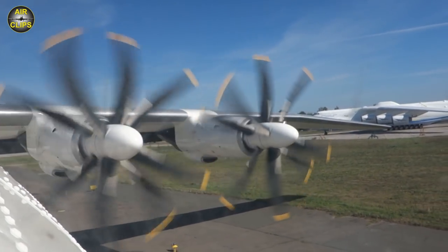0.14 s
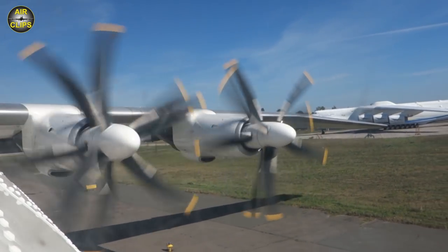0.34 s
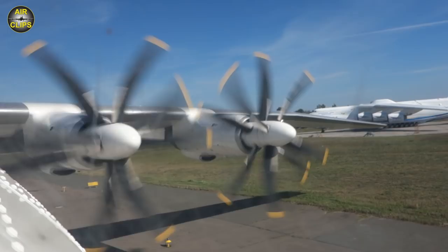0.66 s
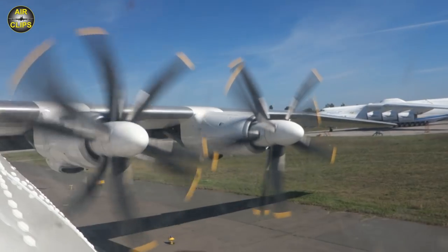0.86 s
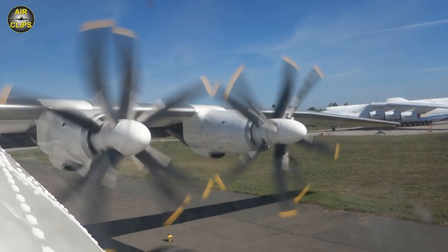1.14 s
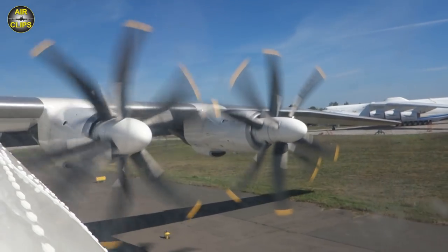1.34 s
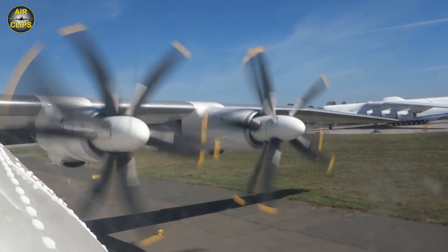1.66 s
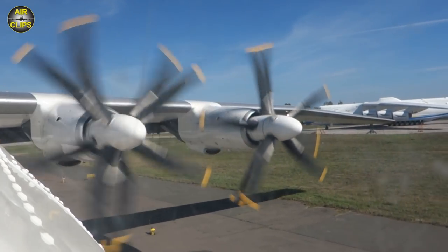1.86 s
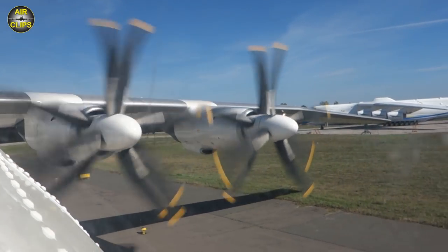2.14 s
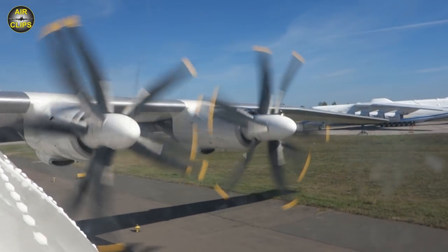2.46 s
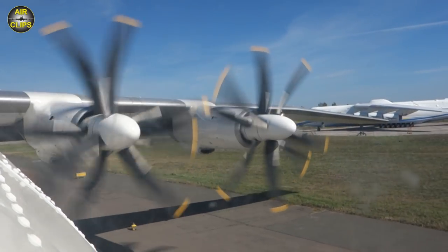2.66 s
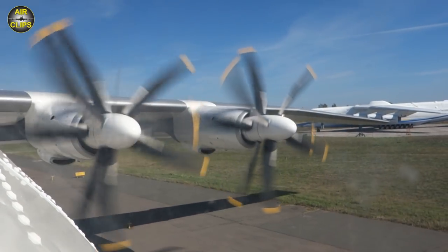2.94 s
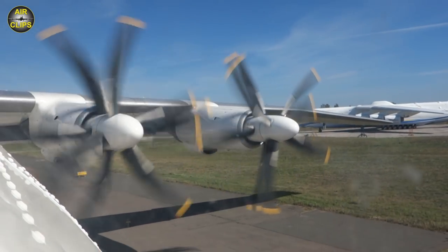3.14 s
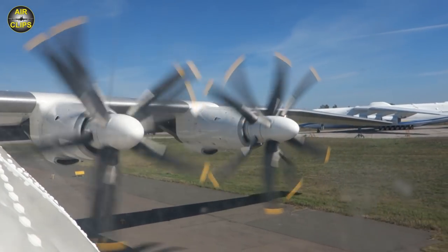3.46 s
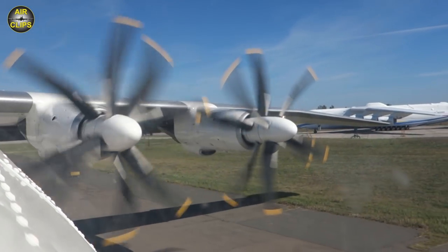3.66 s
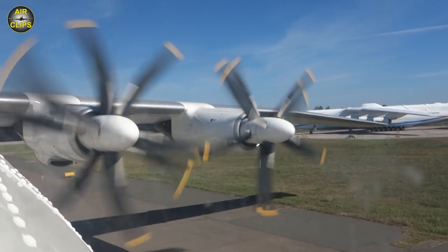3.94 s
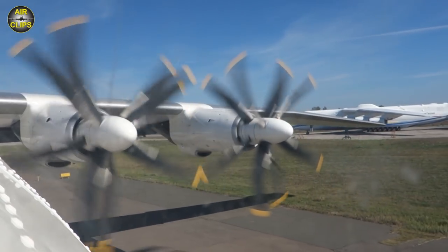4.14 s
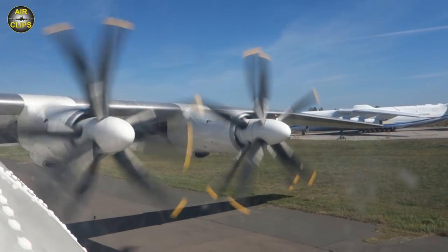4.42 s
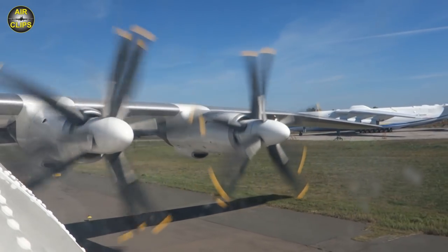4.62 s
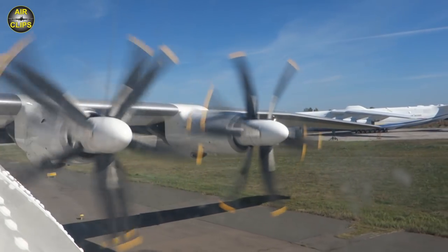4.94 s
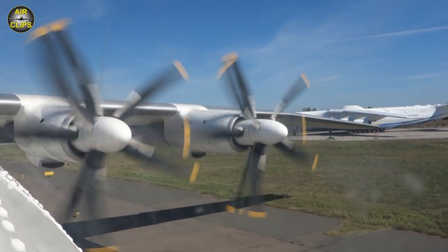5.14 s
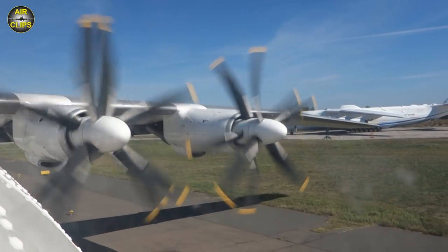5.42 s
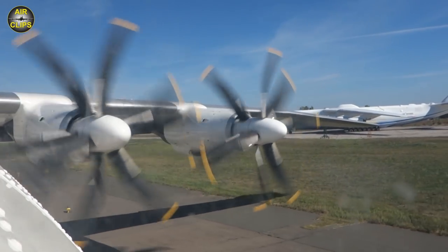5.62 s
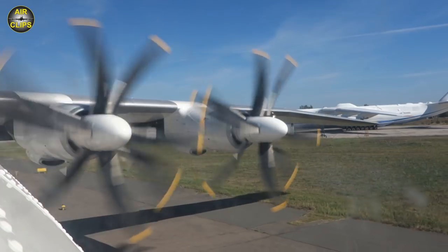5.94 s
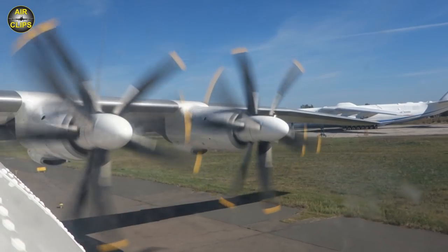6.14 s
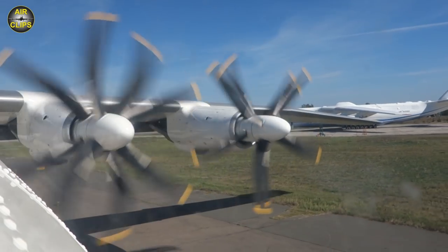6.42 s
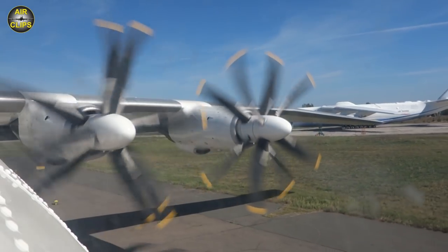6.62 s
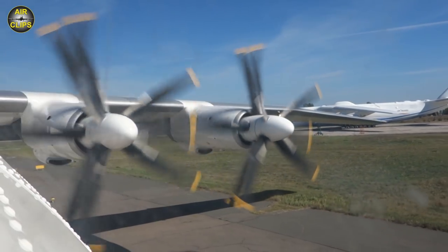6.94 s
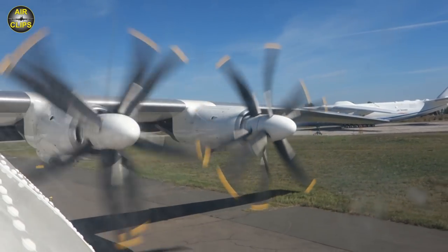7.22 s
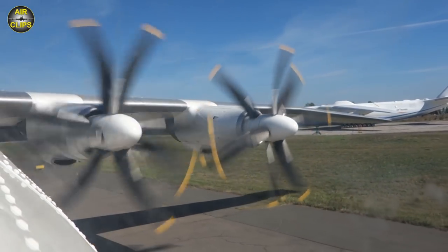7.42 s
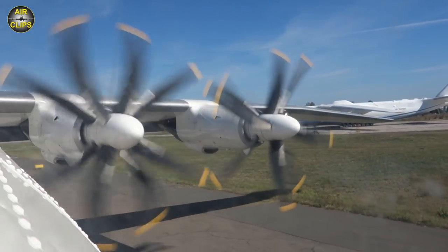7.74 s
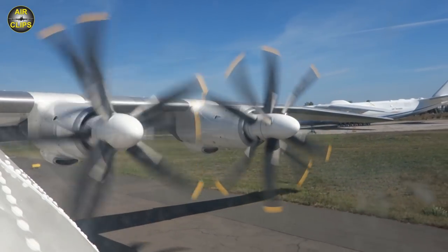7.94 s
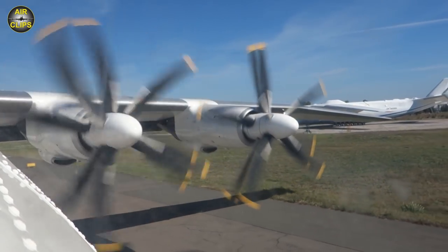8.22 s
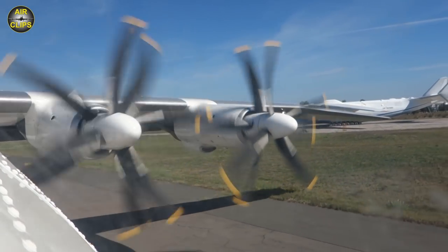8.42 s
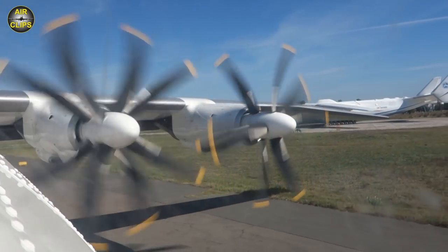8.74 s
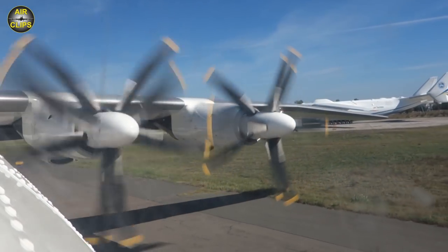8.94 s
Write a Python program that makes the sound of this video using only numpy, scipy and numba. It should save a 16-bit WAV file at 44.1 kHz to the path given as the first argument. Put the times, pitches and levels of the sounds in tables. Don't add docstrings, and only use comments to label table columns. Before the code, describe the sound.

Heard in the cabin beside the wing, large turboprop engines roar loudly and without pause. Two propellers, tuned almost alike, drone and beat together in a low buzzing throb. Muffled rushing air and softer hiss ride above. A thin turbine whine flutters in and out, rises slightly, then after seven seconds slides down; at the very end the hiss brightens.

```python
import sys
import numpy as np
from scipy import signal
from scipy.fft import rfft, irfft
from scipy.io import wavfile
from scipy.ndimage import uniform_filter1d
from numba import njit

SR = 44100
rng = np.random.default_rng(int(sys.argv[2]) if len(sys.argv) > 2 else 0)


def makeup_ratio(level_db):
    decades = np.asarray(level_db, float) / 20
    return 10 ** decades


def unload_audio(sound):
    columns = np.transpose(np.atleast_2d(sound))
    steps = np.round(np.clip(columns, -1, 1) * 32767)
    wavfile.write(sys.argv[1], SR, steps.astype(np.int16))


N = 399987

# frequency in Hz, level in dB per Hz.
ROAR_SPECTRUM = [(12, -38.5), (20, -34.5), (42, -31), (62, -32.5), (80, -15.5), (105, -6), (125, -6.5),
                 (160, -2.5), (215, -2.5), (270, -2.5), (340, -2), (405, -0.5), (435, 0.5), (515, -1.5),
                 (535, -17.5), (600, -19), (780, -27.5), (1320, -120)]
WALL_SPECTRUM = [(330, -39), (560, -1), (750, -4), (822, -1), (884, -3.5), (934, -1), (987, 4),
                 (1040, -1.5), (1140, -15), (1270, -5), (1410, -8), (1610, -2), (1740, -9.5), (2070, -10.5),
                 (2400, -29.5), (3120, -56.5), (5280, -120)]
HISS_SPECTRUM = [(1410, -31.5), (2400, -11), (2620, 0.5), (2940, -9.5), (3100, -6.5), (3310, -9.5),
                 (3640, -2.5), (3880, -6), (4200, -14.5), (4350, -9.5), (4650, -15), (5500, -38)]
TOP_SPECTRUM = [(4200, -26), (4800, -1), (6000, 0), (6900, -2), (7650, -4), (9000, -3.5), (10900, -6),
                (14100, -39)]
DUCT_SPECTRUM = [(6500, -29), (6950, -8.5), (7100, 0.5), (7300, 0.5), (7550, -5), (8000, -31)]
# time in seconds, level in dB about the mean.
AIRFLOW = [(0, 0), (.3, 1), (.8, -1.1), (1.3, -0.7), (2.2, -0.9), (2.9, -0.1), (3.5, -0.5), (4.5, -1.9),
           (5.8, -0.5), (6.4, -0.5), (7.2, 0.5), (7.8, -1.1), (9.07, 0.2)]
# centre in seconds, length in seconds, rise in dB.
WASH_GUSTS = [(0.196, 0.072, 2.5), (1.002, 0.3, 0), (1.949, .1, 1.5), (2.586, 0.6, 2), (2.983, 0.14, 1),
              (4.078, .08, 1.5), (5.203, 0.066, -0.5), (5.358, 0.089, -2), (6.215, 0.13, 0.5),
              (6.55, .15, 2), (7.206, .1, 1), (7.472, .08, 1), (7.749, 0.066, 1.5), (8.67, 0.11, 1)]
# wall, hiss, top, duct. Level in dB; dB per dB of airflow; rise in dB with the bleed valve open.
FLOW_DB = [-26, -47, -53, -61]
FLOW_DB_PER_AIR_DB = [0.89, 1.02, 1, 1]
BLEED_RISE_DB = [0.39, 3, 1.7, .3]
# order of the blade rate, level in dB.
NEAR_BLADE_TONES = [(1, -53), (2, -36), (3, -30), (4, -32), (5, -31), (6, -32), (7, -29), (8, -32),
                    (9, -32)]
FAR_BLADE_TONES = [(1, -51), (2, -36), (3, -29), (4, -33), (5, -34), (6, -33), (7, -33), (8, -32), (9, -32),
                   (10, -31)]
# order, centre in seconds, length in seconds, rise in dB.
NEAR_IN_STEP = [(1, .75, .5, 7), (1, 1.25, .4, 8), (1, 3.2, 1.4, 5), (1, 5.8, .7, 6), (1, 7.9, 1.3, 13),
                (2, .3, 1.0, 10), (2, 3.7, .9, 11), (2, 4.7, .8, 8), (5, 1.6, 1.2, 5), (5, 3.65, .7, 11),
                (5, 4.6, .8, 9), (5, 7.5, 1.2, 7)]
FAR_IN_STEP = [(2, 8.8, 1.0, 9), (3, .5, .5, 6), (3, 1.5, .4, 5), (3, 3.1, 1.3, 7), (3, 5.6, 2.0, 8),
               (3, 7.65, .9, 7), (3, 8.9, 1.0, -6), (7, 2.15, .6, 9), (7, 3.1, 1.2, 6), (7, 4.5, .4, 7),
               (7, 6.5, 1.8, 8)]
# time in seconds, whine pitch in Hz.
SPOOL_HZ = [(0, 3515), (.45, 3532), (.9, 3534), (1.5, 3552), (2.4, 3591), (2.95, 3598), (3.35, 3593),
            (4.3, 3556), (4.8, 3549), (5.2, 3557), (6.0, 3588), (6.35, 3597), (6.65, 3592), (6.9, 3570),
            (7.2, 3524), (7.8, 3401), (8.4, 3292), (9.07, 3208)]
# time in seconds, level in dB, share chopped into side tones (0-1).
INTAKE_WHINE = [(0, -70, .4), (.4, -56, .15), (.9, -52, .02), (1.4, -51, .05), (1.65, -59, .55),
                (2.3, -59, .45), (2.75, -52, .25), (3.4, -61, .4), (4.05, -58, .1), (4.4, -64, .6),
                (5.05, -54, .1), (5.75, -54, .3), (6.45, -52, .93), (6.85, -54, .25), (7.3, -47, .06),
                (7.55, -58, .1), (7.8, -54, .05), (9.07, -66, .6)]
# frequency in Hz, left minus right in dB, likeness (-1..1), right phase in
PORTS_BY_HZ = [(60, 0, .97, -.1), (400, -.1, .99, -.19), (650, .4, .86, .09), (1000, -2.7, .96, -.13),
               (1100, -1.5, .9, -.2), (1150, -.2, .2, -.29), (1210, .1, .9, 0), (1550, -3, .97, -.07),
               (1800, -.2, .9, -.4), (2080, -4.2, .9, -.1),
               (2280, -12, .4, -.46), (2600, -2.4, .76, -.66), (2900, -6.9, .45, -1.04),
              (3600, .1, .8, -.11), (4000, -7.9, .3, -.38), (4500, -.9, .46, 0), (5200, -7.1, .36, -.78),
              (6500, -3.9, -.2, 0), (7200, -.5, .27, -.27), (8500, -.6, 0, 0), (10500, -1, -.25, 0)]

WHINE_CYCLES_PER_BLADE, FAR_BLADE_HZ = 73.5, 49.15
ROAR_DB = -14.5
BLEED_S, BLEED_OPENS_S = 8.62, 0.044
CREEP_S, CREEP_DB_PER_S = 7.5, 2.5
UPPER_SIDE_DB = -4
OCTAVE_DB, OCTAVE_DB_PER_DB = -63, 0.6
OCTAVE_DB_PER_S = -0.8
DUCT_HZ, DUCT_DB_PER_HZ = 7080, 0.02


def seconds():
    return np.arange(N) / SR


def curve(table):
    s, *columns = np.transpose(table)
    return [np.interp(seconds(), s, c) for c in columns]


def over_hz(table):
    hz, *columns = np.transpose(table)
    log_hz = np.log(np.fft.rfftfreq(N, 1 / SR) + 1)
    return [np.interp(log_hz, np.log(hz), c) for c in columns]


def unit(x):
    return x / np.sqrt(np.mean(x ** 2))


def walk(rate_hz):
    hold = int(SR / rate_hz)
    steps = np.repeat(rng.standard_normal(N // hold + 1), hold)
    return unit(uniform_filter1d(uniform_filter1d(steps, hold), hold)[:N])


def bump(centre_s, length_s):
    return np.exp(-(2 * (seconds() - centre_s) / length_s) ** 2)


def turns(hz):
    return 2 * np.pi * (np.cumsum(hz) / SR + rng.random())


def spool():
    return uniform_filter1d(curve(SPOOL_HZ)[0], size=SR // 4, mode="nearest")


def coloured(gain, spectrum):
    noise = gain * rng.standard_normal((2, N))
    return unit(irfft(rfft(noise) * makeup_ratio(over_hz(spectrum)[0]), N))


def roar():
    return makeup_ratio(ROAR_DB) * coloured(makeup_ratio(0.19 * walk(3.036)), ROAR_SPECTRUM)


def flow(near, far):
    t = seconds()
    gusts_db = sum(rise_db * bump(s, length_s) for s, length_s, rise_db in WASH_GUSTS)
    air_db = curve(AIRFLOW)[0] + gusts_db + 0.5 * walk(20) + 0.46 * walk(28)
    bleed = np.clip((t - BLEED_S) / BLEED_OPENS_S, 0, 1)
    bands = zip(FLOW_DB, FLOW_DB_PER_AIR_DB, BLEED_RISE_DB)
    wall_db, hiss_db, top_db, duct_db = [db + law * air_db + rise * bleed for db, law, rise in bands]
    top_db = top_db + CREEP_DB_PER_S * np.clip(t - CREEP_S, 0, 1)

    flicker_db = 0.3 * walk(18) + 0.3 * walk(35)
    throb_db = 0.6 * np.cos(near) + 0.5 * np.cos(far) + 0.4 * np.cos(2 * near)
    wall = coloured(makeup_ratio(flicker_db + 0.65 * walk(14) + 0.87 * throb_db), WALL_SPECTRUM)
    hiss = coloured(makeup_ratio(flicker_db + 0.71 * walk(12) + 0.5 * throb_db), HISS_SPECTRUM)
    top = coloured(makeup_ratio(flicker_db + 0.5 * walk(16) + 0.4 * throb_db), TOP_SPECTRUM)
    duct = coloured(makeup_ratio(flicker_db + 1.5 * walk(11) + 0.8 * throb_db), DUCT_SPECTRUM)
    return makeup_ratio(wall_db) * wall + makeup_ratio(hiss_db) * hiss + makeup_ratio(top_db) * top + makeup_ratio(duct_db) * duct


def propeller(phase, tones, in_step, thrust_db):
    out = 0
    for k, db in tones:
        swells = [rise_db * bump(s, length_s) for order, s, length_s, rise_db in in_step if order == k]
        waver_db = 0.8 * walk(5) if swells else 2.2 * walk(4)
        level_db = db + thrust_db + sum(swells) + waver_db
        tone_phase = k * (phase + 0.1 * walk(5)) + 2 * np.pi * rng.random()
        out = out + makeup_ratio(level_db) * np.sin(tone_phase)
    return np.sqrt(2) * out


def propellers(near, far):
    blade_hz = spool() / WHINE_CYCLES_PER_BLADE
    slowing_db = 2.2 * np.minimum(blade_hz - 48, 0)
    near_tones = propeller(near, NEAR_BLADE_TONES, NEAR_IN_STEP, slowing_db)
    return near_tones + propeller(far, FAR_BLADE_TONES, FAR_IN_STEP, 0)


def whine(near):
    level_db, chop = curve(INTAKE_WHINE)
    tone_db = level_db + 10 * np.log10(1 - chop)
    below_db = level_db + 10 * np.log10(chop) - 1 + 1.5 * walk(4)
    above_db = below_db + UPPER_SIDE_DB + 2 * walk(4)
    octave_db = OCTAVE_DB + OCTAVE_DB_PER_DB * (tone_db + 54) + OCTAVE_DB_PER_S * seconds()
    octave_db = octave_db + DUCT_DB_PER_HZ * np.minimum(2 * spool() - DUCT_HZ, 0)

    base = WHINE_CYCLES_PER_BLADE * near + 0.45 * walk(14)
    out = 0
    for db, k in [(tone_db, 0), (below_db, -1), (above_db, 1), (above_db - 3, 2), (above_db - 7, 3)]:
        out = out + makeup_ratio(db + 0.5 + 1.5 * walk(15)) * np.sin(base + k * near)
    for db, k in [(-3, 0), (-3, 1), (-7, -1), (-7, 2)]:
        out = out + makeup_ratio(octave_db + db + 2.5 * walk(7)) * np.sin(2 * base + k * near)
    return np.sqrt(2) * out


def ports(shared, apart):
    tilt_db, like, lag_rad = over_hz(PORTS_BY_HZ)
    like = np.clip(like, -1, 1)
    both = rfft(shared) * np.sqrt((1 + like) / 2)
    other = rfft(apart) * np.sqrt((1 - like) / 2)
    left = (both + other) * makeup_ratio(tilt_db / 2) * np.exp(-0.5j * lag_rad)
    right = (both - other) * makeup_ratio(-tilt_db / 2) * np.exp(0.5j * lag_rad)
    return irfft([left, right], N)


def scene():
    near = turns(spool() / WHINE_CYCLES_PER_BLADE)
    far = turns(FAR_BLADE_HZ + 0.11795 * walk(1))
    shared, apart = roar() + flow(near, far)
    return ports(shared + propellers(near, far) + whine(near), apart)


@njit
def ride(x, attack, release, top, squeeze):
    gain, level = np.empty(len(x)), top
    for i in range(len(x)):
        level += (x[i] - level) * (attack if x[i] > level else release)
        gain[i] = (top / level) ** squeeze
    return gain


def low_pass(x):
    return signal.sosfilt(signal.butter(12, 10990, fs=SR, output="sos"), x)


def record(dry):
    attack_s, release_s, ahead_s = 0.0007, 0.028, 0.0015
    level = np.abs(dry).mean(0) + 1e-9
    gain = ride(level, 1 / (attack_s * SR), 1 / (release_s * SR), 0.48, 0.7)
    ahead = int(ahead_s * SR)
    gain = np.roll(uniform_filter1d(gain, ahead), -ahead)
    mix = np.tanh(0.6 * gain * dry) / 0.6
    return low_pass(mix)


dry = scene()
out = record(dry)
unload_audio(out)
```